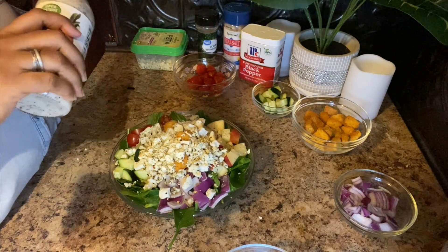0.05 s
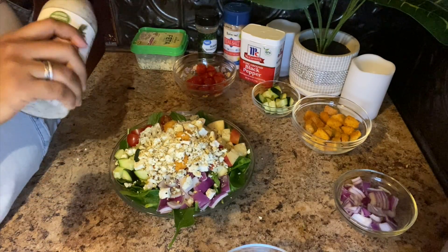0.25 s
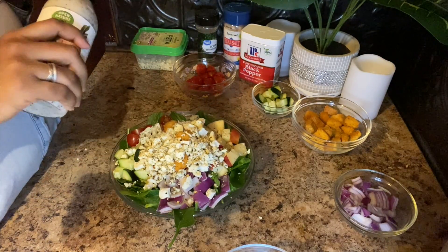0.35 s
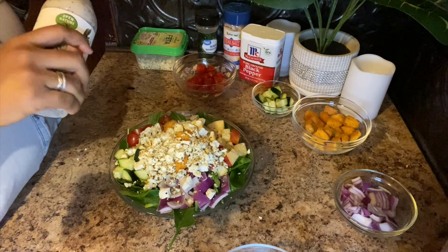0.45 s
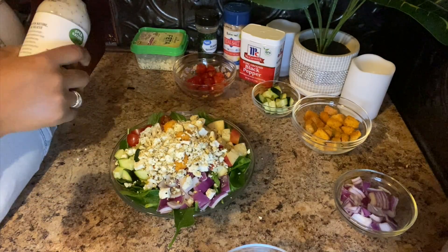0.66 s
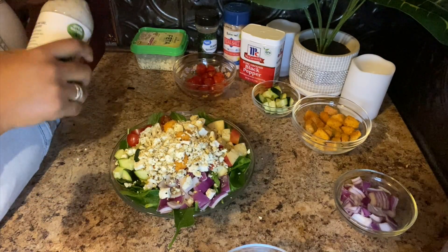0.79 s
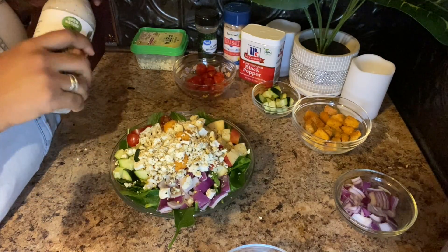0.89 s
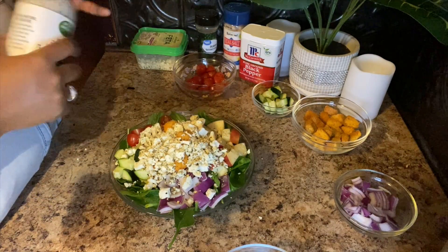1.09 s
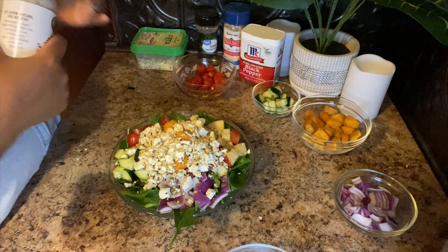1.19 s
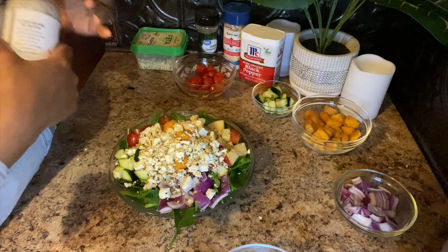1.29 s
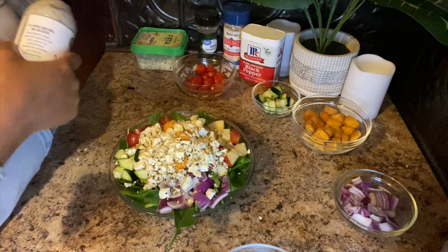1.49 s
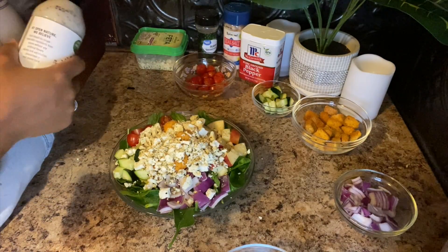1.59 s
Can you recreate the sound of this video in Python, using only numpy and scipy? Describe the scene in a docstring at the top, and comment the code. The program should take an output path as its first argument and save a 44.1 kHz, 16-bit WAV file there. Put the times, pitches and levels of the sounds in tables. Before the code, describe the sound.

A thin plastic bottle snaps and crunches as hands shake and twist it, its contents sloshing lightly. After a brief lull comes a denser burst that thins to faint cracks. It sounds close, in a small kitchen with a faint appliance hum.

```python
"""A kitchen appliance hums in a small hard room. From 0.1 s a plastic bottle is shaken and twisted
above a stone counter: its thin wall snaps, crunches and rings briefly in its modes, the hands rub
over it and air pockets resonate in the sloshing contents. After a lull near 0.8 s comes a second
burst, which thins to a few faint cracks by 1.6 s. The room answers each sound with reflections
and a short tail, heard through two closely spaced microphone ports."""
import sys
import numpy as np
from scipy import signal
from scipy.fft import rfft, irfft
from scipy.io import wavfile
from scipy.ndimage import uniform_filter1d

SR = 44100
rng = np.random.default_rng(int(sys.argv[2]) if len(sys.argv) > 2 else 0)


def inscribe(sig):
    """Save sig as 16-bit PCM at rate SR to the path in sys.argv[1].

    A 1-D sig is mono; a 2-D sig holds one channel per row.
    Samples are clipped to [-1, 1] before scaling.
    """
    pcm = np.round(np.clip(np.atleast_2d(sig).T, -1, 1) * 32767)
    wavfile.write(sys.argv[1], SR, pcm.astype(np.int16))


N = 72765
SIDES = np.array([[1], [-1]])  # left, right


def undb(db):
    """Decibels to amplitude ratio."""
    return 10 ** (np.asarray(db) / 20)


def unit(x):
    """Normalisation to rms 1."""
    return x / np.sqrt(np.mean(x ** 2) + 1e-20)


def band(x, lo_hz, hi_hz, order=3):
    """Causal Butterworth band-pass."""
    edges = [lo_hz, min(hi_hz, SR / 2 - 100)]
    return signal.sosfilt(signal.butter(order, edges, "band", fs=SR, output="sos"), x)


def by_bin(points):
    """Interpolation of (frequency, value) points at every bin, on a log frequency axis."""
    hz, value = np.array(points, float).T
    return np.interp(np.log(np.linspace(0, SR / 2, N + 1) + 1), np.log(hz + 1), value)


def shape(x, gain):
    """Filtering by spectral multiplication; mirroring keeps the ends smooth."""
    return irfft(rfft(np.concatenate([x, x[::-1]])) * gain)[:N]


def add(out, start_s, x):
    """Superposition of a short sound at a given time."""
    i = max(int(start_s * SR), 0)
    out[i:i + len(x)] += x[:max(N - i, 0)]


def wander(rate_hz):
    """Smoothed random steps with rms 1."""
    k = int(SR / rate_hz)
    steps = np.repeat(rng.standard_normal(N // k + 1), k)
    return unit(uniform_filter1d(uniform_filter1d(steps, k), k)[:N])


# spectrum of the room noise (frequency [Hz], relative density [dB])
AIR_SPECTRUM = [(20, -7), (45, -7), (80, 5.5), (120, -7), (210, -6.5), (275, 3), (345, -14), (425, -3),
                (540, -13), (650, -8), (800, -24.5), (1500, -25.5), (3000, -41.5), (8000, -53),
                (16000, -48)]
# part of it in antiphase at the two ports (frequency [Hz], gain [dB])
AIR_ANTIPHASE = [(30, -14), (80, -32), (140, 8), (300, -2.5), (1000, 4), (8000, -4)]
def air_rush(level_db=-52.5):
    """Partial coherence: a soft rush of air has a common part and one that differs between ports."""
    mid, side = (unit(shape(rng.standard_normal(N), undb(by_bin(AIR_SPECTRUM)))) for _ in range(2))
    side = shape(side, undb(by_bin(AIR_ANTIPHASE)))
    return undb(level_db - SIDES * 1.6) * (mid + SIDES * side)


# appliance tones (frequency [Hz], level [dB], left minus right [dB], phase lead of the left [rad])
HUM_LINES = [(58.9, -55, -4.5, 0.22), (75.2, -56, -4, 0), (177, -60.5, 2, 0.065), (282.9, -59, 4, 0.35),
             (299, -57, -4, 0.67), (475.2, -53, -2.5, 0.77)]
def appliance_hum(waver_db=2.5):
    """Line spectrum: motor and mains give fixed pitches, each wavering in level."""
    t, out = np.arange(N) / SR, np.zeros((2, N))
    for hz, db, pan_db, lead in HUM_LINES:
        rms = undb(db + SIDES * pan_db / 2 + waver_db * wander(rate_hz=5.9))
        out += np.sqrt(2) * rms * np.sin(2 * np.pi * (hz * t + rng.random()) + SIDES * lead / 2)
    return out


# reverberant tail (lower edge [Hz], upper edge [Hz], T60 [s], gain [dB])
TAIL_BANDS = [(152, 620, 0.37, -16), (950, 2440, 0.35, -8.5), (2380, 5780, 0.47, -9),
              (6230, 8900, 0.29, -11.5), (11600, 14400, 0.31, -11.5)]
def kitchen(faces, early_decay_s=0.0062, early_db=-8, tail_onset_s=0.0069):
    """Reverberation: reflections from counter and jars, then a diffuse tail, different at each port."""
    t, out = np.arange(SR // 2) / SR, []
    for face in faces:
        early = band(rng.standard_normal(len(t)), 300, 5000, order=1)
        early *= (t > .001) * np.exp(-t / early_decay_s)
        response = undb(early_db) * early / np.linalg.norm(early)
        for lo, hi, t60, db in TAIL_BANDS:
            env = np.minimum(t / tail_onset_s, 1) ** 2 * np.exp(-np.log(1000) * t / t60)
            response += undb(db) * band(rng.standard_normal(len(t)), lo, hi) * env / np.linalg.norm(env)
        out.append(signal.fftconvolve(face, response)[:N])
    return np.array(out)


# delay between the ports (frequency [Hz], phase lag of the right [rad])
PORT_LAG = [(0, 0), (800, 1), (2500, .7), (4300, 1.4), (5500, 3.2), (6400, 5.3), (7600, 6.1), (8900, 6.8),
            (10000, 9), (10750, 9.5), (12000, 12.3), (13000, 12.6), (14300, 13.5), (15200, 15.6),
            (16200, 15.8)]
# balance of the ports (frequency [Hz], left minus right [dB])
PORT_LEVEL_DIFFERENCE = [(500, -4), (1500, -3), (3000, -3), (5000, -3.5), (8000, -1), (14000, 0)]
# the wall's oblique face, which reaches the ports in antiphase (frequency [Hz], gain [dB])
OBLIQUE_GAIN = [(200, -5), (1000, -5.5), (3000, -5), (6200, -5.5), (7900, -28), (9200, -13), (10500, -31),
                (11500, -5), (13000, -24), (14500, -14), (15300, -26)]
def ports(front, oblique):
    """Path difference: direct sound reaches the right port a little later; it is also a little louder."""
    left_gain = undb(by_bin(PORT_LEVEL_DIFFERENCE) / 2)
    right_gain = np.exp(-1j * by_bin(PORT_LAG)) / left_gain
    aside = shape(oblique, undb(by_bin(OBLIQUE_GAIN)))
    return np.array([shape(front + aside, left_gain), shape(front - aside, right_gain)])


def resonances(table, relative_bandwidth):
    """Damped resonance: each soft push gives a decaying band of noise around one frequency."""
    out, t = np.zeros(N), np.arange(SR // 4) / SR
    span = 1 + relative_bandwidth / 2
    for start, hz, decay_s, db in table:
        env = np.minimum(10 * t / decay_s, 1) * np.exp(-t / decay_s)
        push = band(rng.standard_normal(len(t)) * env, hz / span, hz * span, order=2)
        add(out, start, unit(push) * np.sqrt(np.mean(env ** 2)) * undb(db))
    return out


# bumps of the bottle (time [s], frequency [Hz], decay time [s], level [dB])
HAND_BUMPS = [(.262, 140, 0.027, -44.5), (.38, 98, 0.064, -44.5), (.397, 334, 0.006, -38),
              (.499, 300, 0.0063, -44), (.715, 161, 0.023, -42), (.706, 493, 0.016, -41.5),
              (1.19, 398, 0.1, -46.5), (1.279, 308, 0.013, -35), (1.347, 394, 0.012, -39.5),
              (1.38, 150, .01, -36)]
def bumps():
    """Heavy damping: the bottle bumps in the hands with a broad, dull resonance."""
    return resonances(HAND_BUMPS, relative_bandwidth=0.78)


# air pockets (time [s], frequency [Hz], decay time [s], level [dB])
AIR_POCKETS = [(.454, 1650, 0.0074, -33), (.471, 1520, 0.012, -41), (.515, 1540, 0.0057, -34),
               (.535, 1125, 0.0098, -37), (.535, 1450, 0.0063, -46), (.556, 900, 0.027, -44.5),
               (.607, 1585, 0.007, -33), (.631, 1930, 0.0098, -44), (.666, 1565, 0.013, -35),
               (.709, 1420, 0.0056, -33), (.721, 1390, .005, -35), (1.213, 1910, 0.0091, -28.5)]
def sloshes():
    """Bubble resonance: air pockets in the shaken contents each sound a brief pitch."""
    return resonances(AIR_POCKETS, relative_bandwidth=0.14)


# course of the rubbing (time [s], treble level [dB], midrange level [dB])
RUB_LEVELS = [(0.219, -92, -86), (0.231, -46.5, -59.5), (.3, -46, -65), (.42, -55, -63), (0.519, -36, -50),
              (.59, -56.5, -52), (.69, -46.5, -54), (0.756, -45, -49), (.79, -63, -60), (.89, -71, -68),
              (0.962, -75, -72), (1.05, -56, -59.5), (1.061, -54, -44), (1.09, -55, -46.5),
              (1.145, -31, -39), (1.18, -35.5, -37), (1.214, -42, -35), (1.255, -53, -50), (1.31, -45, -59),
              (1.395, -43.5, -42.5), (1.425, -62.5, -65), (1.55, -61, -63.5), (1.65, -58, -60)]
def rubbing(slips_per_s=2000, scatter_db=4):
    """Stick-slip friction: skin on plastic makes dense, tiny impulses of random size."""
    t = np.arange(N) / SR
    times, treble_db, middle_db = np.array(RUB_LEVELS).T
    slips = (rng.random(N) < slips_per_s / SR) * rng.standard_normal(N)
    slips *= undb(scatter_db * rng.standard_normal(N))
    treble = unit(band(slips, 4600, 9360, order=2)) * undb(np.interp(t, times, treble_db))
    middle = unit(band(slips, 515, 2730, order=2)) * undb(np.interp(t, times, middle_db))
    return treble + middle


# flexed patches (time [s], frequency [Hz], decay time [s], level [dB])
PATCH_PINGS = [(.277, 3070, 0.003, -15.5), (.398, 6000, 0.0024, -21.5), (.452, 4150, 0.014, -25.5),
               (1.098, 5150, .004, -22), (1.112, 4740, 0.0076, -25.5), (1.156, 7860, 0.0028, -22),
               (1.228, 8000, 0.0033, -20), (1.281, 1104, .007, -35), (1.281, 2550, 0.005, -21.5),
               (1.2815, 5000, 0.005, -21)]
def pings():
    """Local resonance: a flexed patch of the wall sounds one short pitch."""
    return resonances(PATCH_PINGS, relative_bandwidth=0.18)


# pops of the wall (time [s], centre frequency [Hz], peak level [dB])
WALL_POPS = [(.277, 1310, -28.5), (.398, 845, -32.5), (.4998, 1020, -24.5), (.5004, 2280, -14),
             (.63, 700, -32), (.665, 600, -32), (1.2805, 600, -23.5), (1.347, 700, -31)]
def pops(span=2.06):
    """Impulse response: the whole wall pops in one push and gives a dry, broadband knock."""
    out, push = np.zeros(N), signal.unit_impulse(SR // 20)
    for start, hz, db in WALL_POPS:
        knock = band(push, hz / span, hz * span, order=2)
        add(out, start, undb(db) * knock / np.abs(knock).max())
    return out


# modes of the bottle (frequency [Hz], T60 [s], relative level [dB])
BOTTLE_MODES = [(1830, .14, -7), (2218, .12, -8), (2960, .14, 1), (3100, .12, 0), (3290, .1, -5),
                (3732, .2, 4), (4238, .08, -6), (4506, .1, -6), (5355, .08, -5), (6350, .08, -5),
                (6967, .13, -3), (7296, .12, -3), (7698, .11, -4), (8620, .09, -2)]
def ringing(table, gain_db, scatter_db=1, detune=0.0015):
    """Free vibration: the modes ring on after each crack, varying a little as the grip differs."""
    out, t = np.zeros(N), np.arange(SR // 4) / SR
    hz, t60, mode_db = np.array(BOTTLE_MODES).T[:, :, None]
    env = np.minimum(t / 0.0015, 1) * np.exp(-np.log(1000) * t / t60)
    for start, *_, ring_db in table:
        size, shift = rng.standard_normal((2, len(hz), 1))
        tones = np.sin(2 * np.pi * (hz * (1 + detune * shift) * t + rng.random((len(hz), 1))))
        gains = undb(ring_db + gain_db + mode_db + scatter_db * size)
        add(out, start, np.sum(gains * env * tones, axis=0))
    return out


# five bands of a crack (lower edge [Hz], upper edge [Hz])
CRACK_BANDS = [(200, 1350), (1400, 2500), (2500, 6000), (6000, 10400), (10400, 16200)]
# decay time in each band (multiple of the crack's base decay [1])
DECAY_RATIOS = [1.28, 1.07, 1.26, 1.144, 1.83]
def cracks(table, peak_ms, swell_ms, band_gains_db, rough_db):
    """High modal density: a quick run of slips drives so many wall modes that they merge into noise."""
    out, ms = np.zeros(N), np.arange(-8, 55, 1000 / SR)
    for start, *levels, decay_ms, _ in table:
        slips = undb(rough_db * unit(uniform_filter1d(rng.standard_normal(len(ms)), size=24)))
        for (lo, hi), db, gain_db, ratio in zip(CRACK_BANDS, levels, band_gains_db, DECAY_RATIOS):
            rise, fall = (ms - peak_ms) / swell_ms, (peak_ms - ms) / (decay_ms * ratio)
            env = np.exp(np.minimum(rise, fall))
            burst = band(rng.standard_normal(len(ms)) * slips * env, lo, hi, order=4)
            rms = np.sqrt(np.mean(env ** 2)) * undb(db + gain_db)
            add(out, start + ms[0] / 1000, rms * unit(burst))
    return out


# crunches (time [s], five band levels [dB], base decay [ms], ringing level [dB])
WALL_CRUNCHES = [(0.437, -71, -45, -40, -36, -31, 3.7, -57), (0.5095, -79, -42, -37, -32, -41, 5.3, -80),
                 (0.534, -41, -43, -29, -29, -22.5, 3.1, -58), (0.539, -44, -49, -37, -24, -34, 5.5, -56),
                 (0.552, -28.5, -59, -31, -39, -51, 2.7, -61), (0.718, -48, -38, -36.5, -48, -38, 3.8, -62),
                 (0.944, -44, -50, -42.5, -47, -54, 9.8, -58),
                 (1.0745, -52, -37.5, -34.5, -35, -50, 8.4, -51),
                 (1.0955, -54, -34, -26, -25, -23.5, 2.7, -54), (1.132, -50, -37, -26, -27, -29, 1.8, -49),
                 (1.1425, -42, -30, -28, -26, -29, 4.7, -50), (1.1528, -54, -34, -30, -23, -32, 3.7, -29.5),
                 (1.1865, -50, -36, -30.5, -32, -33, 8.8, -49),
                 (1.202, -39, -30.5, -26, -25.5, -27, 2.7, -38),
                 (1.21, -60, -29.5, -24.5, -25.5, -36, 3.1, -39),
                 (1.2722, -48, -41, -28, -23, -25, 5.2, -45), (1.3715, -51, -60, -40, -30, -42, 4.3, -60),
                 (1.383, -28.5, -36, -30.5, -38, -39, 6.4, -67),
                 (1.4905, -54, -58, -51.0, -54, -53, 5.6, -57), (1.6205, -43, -53.5, -47, -57, -56, 4, -72)]
def crunches():
    """Clustered excitation: many tiny slips swell and fade in a rough burst, and the wall rings."""
    bursts = cracks(WALL_CRUNCHES, peak_ms=2.1, swell_ms=1.8,
                    band_gains_db=[-8.5, 1.3, -2.4, 1, -0.2], rough_db=5)
    return bursts + ringing(WALL_CRUNCHES, gain_db=-8.5)


# snaps (time [s], five band levels [dB], base decay [ms], ringing level [dB])
WALL_SNAPS = [(0.1075, -57, -56.5, -60, -62, -57, 4.3, -72),
              (0.2448, -39.5, -39.5, -20, -19.5, -26, 1.8, -40),
              (0.2759, -37, -27.5, -18.5, -13, -17, 1, -26), (0.2782, -59, -40, -18, -12, -27, 1.9, -28.5),
              (0.2828, -54, -27, -20.5, -27, -26, 1.9, -50), (0.286, -48, -36.5, -27, -22.5, -35, 4.7, -45),
              (0.3972, -41.5, -40, -34, -26, -25.5, 1.96, -50),
              (0.451, -64, -25.5, -19.5, -21, -23, 1.9, -39), (0.4548, -68, -36, -25.5, -22, -26, 2.9, -51),
              (0.4692, -68, -26, -22, -20, -24, 3.3, -34), (0.4993, -48, -31.5, -23, -25.5, -22, 2.8, -52),
              (0.606, -56, -35.5, -32, -30, -38, 2.5, -62), (0.6288, -44, -32, -37, -36, -39, 1.8, -46.5),
              (0.6495, -44, -36.5, -41, -52, -54, 4.1, -59),
              (0.6638, -46, -34.5, -32, -24.5, -30.5, 5, -45),
              (0.7078, -44, -42, -33, -34.5, -38, 2.9, -49),
              (0.9108, -60, -52.5, -48, -49.5, -44.5, 3.4, -58),
              (0.9775, -47.5, -54, -39, -62, -58, 2.3, -53),
              (1.0095, -62, -75, -45, -28, -32.5, 4.1, -51.5),
              (1.0585, -49, -31.5, -34, -36, -40, 1.9, -52), (1.062, -64, -38, -31, -25.5, -25, 3.3, -63),
              (1.1093, -59, -33, -28, -25, -33, 3.8, -58), (1.125, -32.5, -25, -28, -18.5, -21.5, 4.6, -46),
              (1.1368, -36.5, -29, -21, -23, -27, 1.8, -36), (1.1565, -55, -30, -22.5, -28, -32, 3.1, -32),
              (1.2265, -65, -31, -25, -34, -24.5, 2.2, -45),
              (1.2802, -34.5, -23.5, -20, -12, -20, 2.5, -37.5),
              (1.3232, -50, -57, -40, -26.5, -38, 2.8, -66),
              (1.3462, -34, -31.5, -25.5, -24.5, -31.5, 3.9, -59),
              (1.581, -57, -52.5, -42.5, -41.5, -51, 3.3, -57)]
def snaps():
    """Impulsive excitation: the thin wall snaps with a sharp onset and a wide spectrum, then rings."""
    bursts = cracks(WALL_SNAPS, peak_ms=0.98, swell_ms=0.52, band_gains_db=[0, 1, 1, 1, 1], rough_db=1.5)
    return bursts + ringing(WALL_SNAPS, gain_db=-6.0)


def wall():
    """Radiation from one face of the bottle: the sum of its vibrations."""
    return snaps() + crunches() + pings() + rubbing()


def scene():
    """Direct plus reverberant field: one face points at the microphone, another away to the side."""
    contents = sloshes() + bumps()
    front, oblique = wall() + pops(), wall()
    leaked = undb(-1.5) * contents  # the closed bottle sends less of its contents into the room
    room = kitchen([front + leaked, oblique + leaked])
    direct = ports(front + contents, oblique)
    return undb(-1.5) * (direct + room) + appliance_hum() + air_rush()


# frequency response of the microphone (frequency [Hz], gain [dB])
MIC_RESPONSE = [(1000, 0), (3000, -1), (5500, 3.5), (6200, -1), (8300, 3), (9100, 1), (9800, 3),
                (11000, 0.5), (14400, -0.5), (15200, -7), (16200, -6)]
def record(dry):
    """Transduction: the microphone colours the treble, saturates softly and cuts above 16.2 kHz."""
    coloured = np.array([shape(x, undb(by_bin(MIC_RESPONSE))) for x in dry])
    low_pass = signal.ellip(8, .1, 50, 16200, fs=SR, output="sos")
    return signal.sosfiltfilt(low_pass, np.tanh(coloured))


dry = scene()
out = record(dry)
inscribe(out)
```